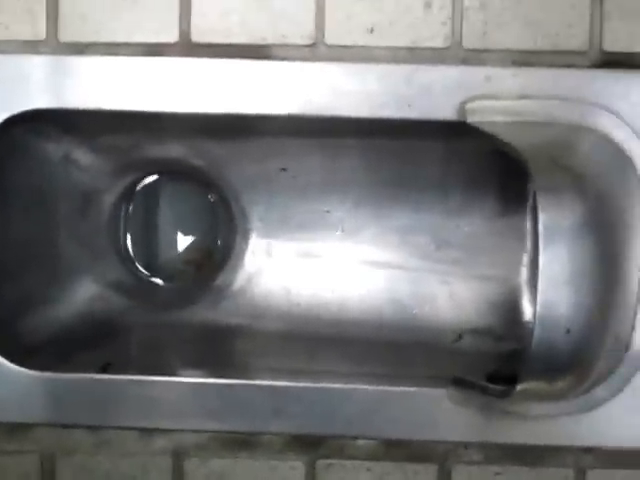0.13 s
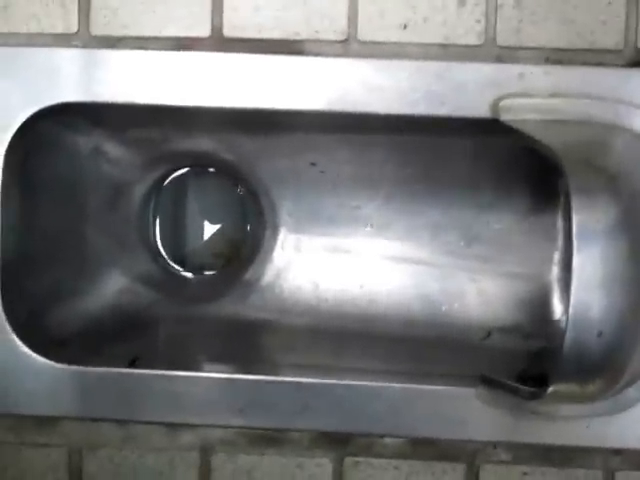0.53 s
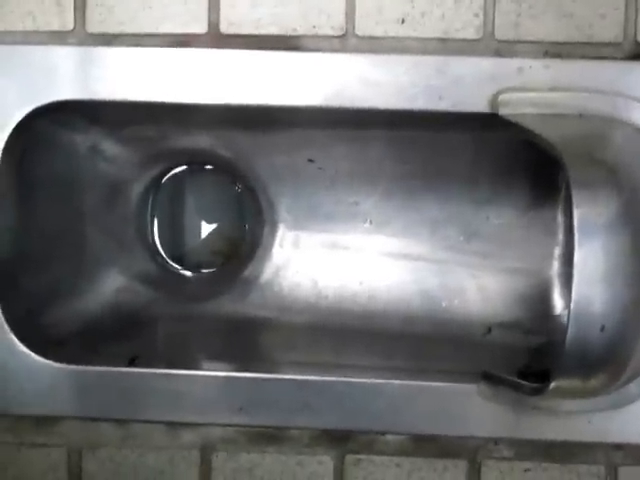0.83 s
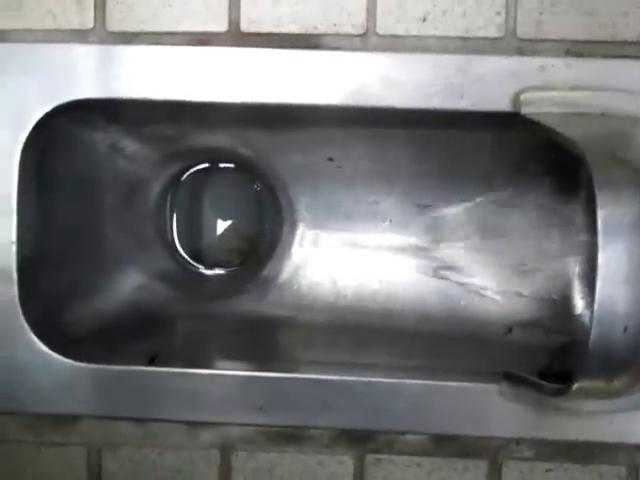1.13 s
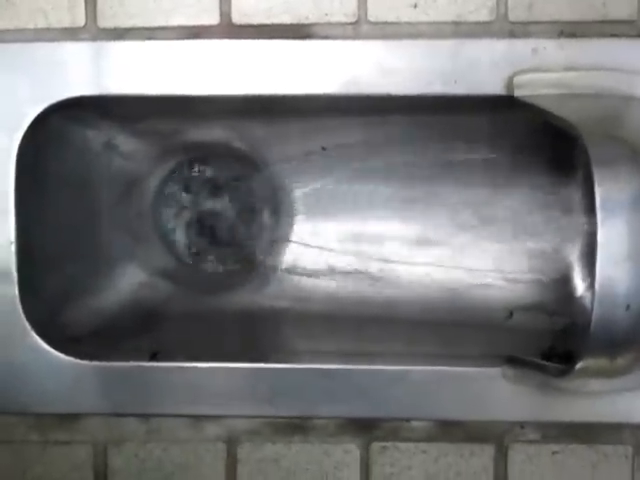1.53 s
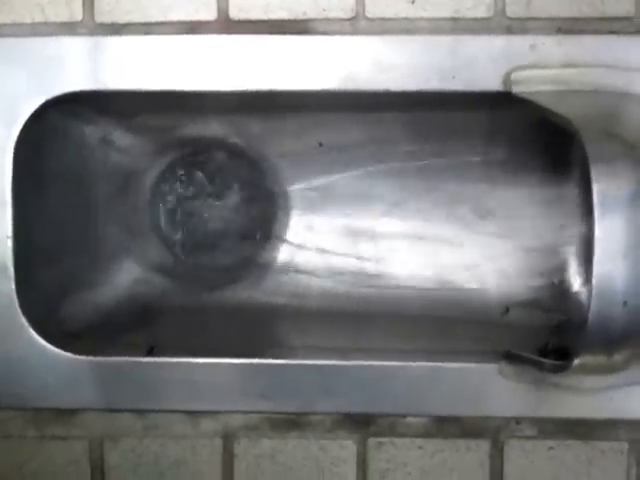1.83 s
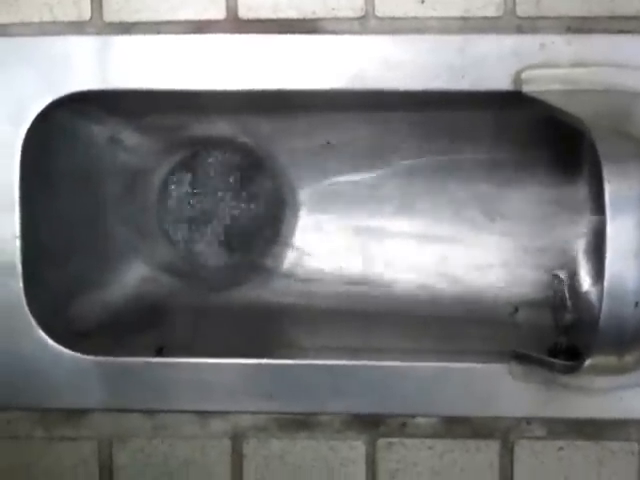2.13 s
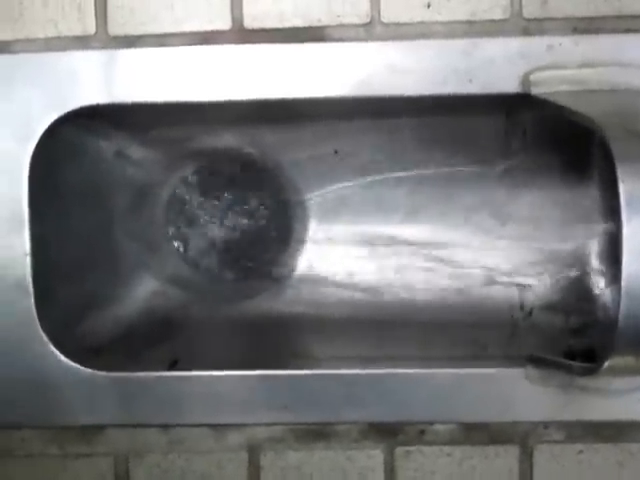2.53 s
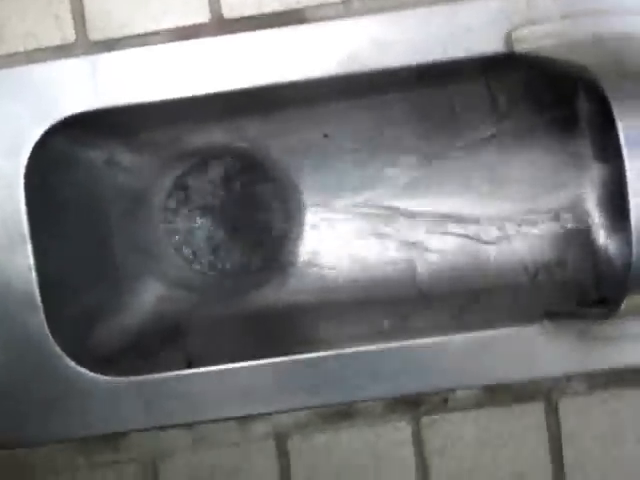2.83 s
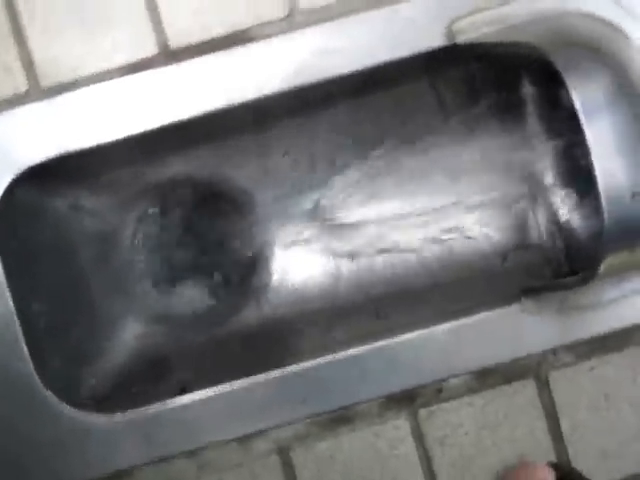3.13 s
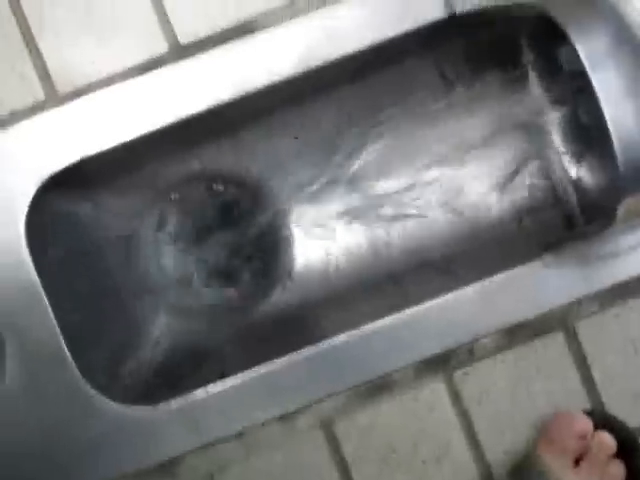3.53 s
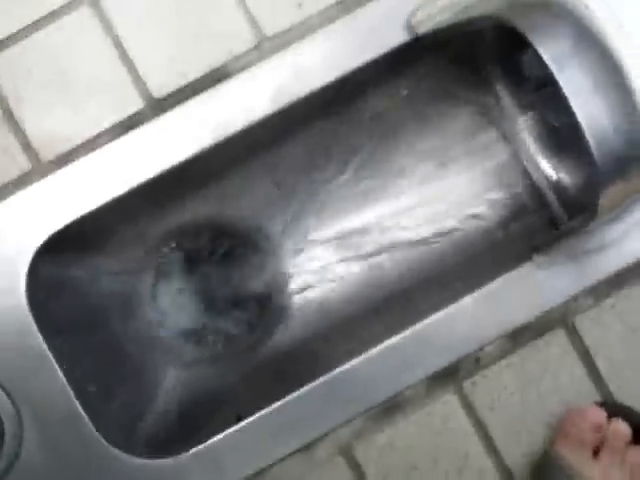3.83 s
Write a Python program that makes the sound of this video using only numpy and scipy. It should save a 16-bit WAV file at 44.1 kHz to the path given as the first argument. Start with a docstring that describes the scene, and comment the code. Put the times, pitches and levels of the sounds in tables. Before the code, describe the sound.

Close handling clicks of a small plastic camera over a thin, growing rush of toilet water.

```python
"""The plastic housing of a small hand-held camera ticks, cracks and rustles in the hand, right at its microphone.
Each tick is a snap and a run of micro-slips that ring the housing. Slaps and scuffs close by, likely sandal and
clothing, are swells of gritty noise. In this tiled restroom a steel squat toilet starts to flush: a thin sheet of
water, made of ringing bubbles, a noisy rush and a few spurts, runs along the trough. Feedback delays give the room;
the electronics whine faintly, a nearly steady sine, over noise hiss and rumble."""
import sys
import numpy as np
from scipy import signal
from scipy.fft import rfft, irfft, next_fast_len
from scipy.io import wavfile

SR = 44100
rng = np.random.default_rng(int(sys.argv[2]) if len(sys.argv) > 2 else 0)


def digitize_waveform(pressure):
    """Quantize a signal to 16-bit integers and store it at the path in sys.argv[1].

    Rows of a 2-D input are taken as channels; values are limited to [-1, 1].
    """
    field = np.atleast_2d(pressure).T
    bounded = np.clip(field, -1, 1)
    quanta = np.round(bounded * 32767).astype(np.int16)
    wavfile.write(sys.argv[1], SR, quanta)


N = 176400  # samples, 4 s
TIME_S = np.arange(N) / SR


def amp(db):
    """dB to gain."""
    return 10 ** (np.asarray(db) / 20)


def rms_one(x):
    """Scale to rms 1."""
    return x / np.sqrt(np.mean(x ** 2) + 1e-20)


def in_time(rows):
    """A (seconds, value) curve at every sample."""
    s, value = np.transpose(rows)
    return np.interp(TIME_S, s, value)


def drift(rate_hz):
    """Random wander of spread 1: noise through two equal low-pass poles, made at every 40th sample."""
    r = np.exp(-80 * np.pi * rate_hz / SR)
    noise = rng.standard_normal(N // 40 + 2002)
    slow = signal.lfilter([1], [1, -2 * r, r * r], noise)[2000:]  # drop the filter's settling
    return np.interp(np.arange(N) / 40, np.arange(len(slow)), rms_one(slow))


def ring(x, hz, t60_s):
    """A resonance: a unit click sets a dying sine of height about 1 ringing."""
    r, w = amp(-60 / (t60_s * SR)), 2 * np.pi * hz / SR
    return signal.lfilter([0, np.sin(w)], [1, -2 * r * np.cos(w), r * r], x + 1e-18)


def filtered(x, order, hz, kind):
    """Butterworth filter."""
    return signal.sosfilt(signal.butter(order, hz, kind, fs=SR, output="sos"), x)


def banded_noise(spectrum, patchy_db, rate_hz):
    """Third-octave bands of noise that flicker partly together, partly each alone; rms 1."""
    hz, db = np.transpose(spectrum)
    edges = 20 * 2 ** np.arange(0, 9.4, 1 / 3)
    out, together, white = 0, drift(rate_hz), rng.standard_normal((2, N))
    for k, (low, high) in enumerate(zip(edges, edges[1:])):
        band = filtered(white[k % 2], 2, [low, high], "band")
        level_db = np.interp(np.log(low * high) / 2, np.log(hz), db)
        out = out + band * amp(level_db + patchy_db * (2 * together + drift(rate_hz)))
    return rms_one(out)


# Ticks of the housing in the hand, at the microphone. Each row: start in seconds, drive level in dB before the modes,
# bass and treble drive in dB relative to it before their lifts, decay time of the slips in ms.
HOUSING_TICKS = [(0.007, -33.5, -14, -8, 3.4), (0.059, -38.5, -7, -25, 4), (0.079, -31, -19.5, -16, 2.6),
                 (0.096, -47.5, 0, -29, 3.5), (0.171, -38, -9.5, -32, 2.7),
                 (0.196, -30.5, -12.5, -14.5, 2.9), (0.204, -34, -12, -18, 3.2),
                 (0.238, -30, -17, -27, 2.5), (0.25, -37.5, -9.5, -8.5, 27),
                 (0.292, -13.5, -14.5, -9.5, 2.8), (0.312, -28.5, -16, -12.5, 11),
                 (0.393, -33.5, -15, -31, 2.2), (0.422, -54, 7, -21, 2.7), (0.436, -34, -13, -7.5, 2.2),
                 (0.47, -31.5, -15, -11, 2.2), (0.495, -29.5, -15, -15, 2.4), (0.515, -27.5, -17, -17, 21),
                 (0.548, -13, -14.5, -9.5, 4.1), (0.562, -30, -24, -11.5, 19), (0.621, -47, -4, -22, 3),
                 (0.677, -34, -10.5, -24, 4.9), (0.721, -16.5, -9, -9.5, 4.3), (0.873, -42, -9.5, -25, 3.2),
                 (0.907, -31, -12.5, -29, 1.5), (0.935, -40.5, -9, -9, 6.1), (0.989, -40.5, -8.5, -11, 5.9),
                 (1.006, -40, -24, -9, 16), (1.015, -26.5, -14, -17, 2), (1.061, -31, -15, -13.5, 1.2),
                 (1.179, -36, -10.5, -20, 3), (1.227, -41.5, -9.5, -11, 4), (1.323, -62, 7.5, -22, 2.7),
                 (1.355, -57, -10, -30, 3), (1.382, -46, -3, -23, 2.5), (1.406, -43.5, -4, -7, 19),
                 (1.445, -12.5, -13, -6.5, 3.1), (1.459, -23, -27, -7, 1.9),
                 (1.502, -21.5, -11.5, -3.5, 1.6), (1.532, -29, -22, -22, 3.3),
                 (1.558, -19.5, -16, -9, 5.6), (1.596, -11, -19, -16, 0.97), (1.656, -26, -10.5, -9, 3),
                 (1.701, -33.5, -4, -22, 3.7), (1.728, -25.5, -13.5, -18, 2.7), (1.747, -38, -25, -8, 2.2),
                 (1.782, -33.5, 0, -1.5, 4.8), (1.852, -38, -9.5, -21, 3.2), (1.94, -37, -8, -21, 7.9),
                 (1.993, -38.5, -4.5, -5.5, 4.5), (2.04, -34.5, -13, -16, 3.5),
                 (2.086, -30.5, -13, -18.5, 2.2), (2.171, -42.5, -1.5, -11, 3),
                 (2.381, -19.5, -11.5, -6, 3.8), (2.408, -40, -12, -7, 3.5), (2.425, -32, -13, -18, 4.1),
                 (2.463, -42, -7, -21, 3), (2.599, -36, -13, -8, 3.3), (2.666, -14.5, -15, -1.5, 2.6),
                 (2.736, -32, -14, -13, 2.5), (2.758, -43.5, 4.5, -10, 3.8),
                 (2.823, -22.5, -16.5, -25.5, 5.1), (2.858, -37, -7, -21, 3), (2.884, -36.5, -12, -31, 3.9),
                 (2.93, -34, -9, -27, 2.6), (2.995, -31, -10.5, -20, 3.4), (3.032, -47, -7, -18, 2.7),
                 (3.075, -34.5, -13, -3, 2.3), (3.082, -33.5, -3.5, -20, 5.6),
                 (3.222, -28, -15.5, -26, 2.8), (3.243, -33.5, -4.5, -32, 3.3), (3.27, -36.5, -11, -18, 3),
                 (3.323, -35, -9.5, -20, 5.1), (3.435, -35.5, -13, -34, 4.2), (3.489, -30, -7.5, -10.5, 14),
                 (3.539, -26.5, -14, -15, 1.3), (3.56, -32, -10, -15, 11), (3.622, -1, -28.5, -12, 2.3),
                 (3.696, -11.5, -25.5, -32, 2.9), (3.728, -18.5, -13, -12, 1.2),
                 (3.85, -11.5, -20.5, -12.5, 2.1), (3.896, -38.5, -1, -8, 1.8),
                 (3.966, -41.5, -3, -5.5, 14)]
# Ringing modes of the plastic housing. Each row: frequency in Hz, relative level in dB, 60 dB decay in seconds.
HOUSING_MODES = [(401.4, -3, 0.027), (591, -6.5, 0.032), (668, -1.5, 0.02), (947, -2, 0.021),
                 (1230, -2.5, 0.022), (1440, -3.5, 0.031), (1622, 1.5, 0.015), (2240, -2.5, 0.019),
                 (2670, 0.5, 0.0096), (3830, -5.5, 0.0045), (4615, -7.5, 0.01), (5760, -3, 0.0043),
                 (6730, -19, 0.0083), (6955, -5, 0.0034), (8650, -12, 0.0057), (11420, -2.5, 0.006)]
BASS_HZ, TREBLE_HZ = 800, 2400  # modes up to / above these take the bass / treble drive
BASS_LIFT_DB, TREBLE_LIFT_DB = 15.5, 12
SNAP_DELAY_S, SLIP_DB, CRACK_DB, THUMP_DB = 0.0014, -12, -22.5, -15
SMALL_TICKS_PER_S, SMALL_TICK_MIN_DB = 25, -54
MODE_SCATTER_DB, HOUSING_LOW_CUT_HZ = 2.5, 260


def housing():
    """Each tick is a snap and a dying run of bright micro-slips; they ring the modes and crack."""
    t = np.arange(int(.03 * SR)) / SR
    drives = np.zeros((3, N + 2 * len(t)))  # bass, middle, treble
    grits = rng.standard_normal((len(HOUSING_TICKS), len(t)))
    for (s, db, bass_db, treble_db, decay_ms), grit in zip(HOUSING_TICKS, grits):
        slips = amp(SLIP_DB) * np.diff(grit, prepend=0) * np.exp(-1000 * t / max(decay_ms, .2))
        slips[0] = 1  # the snap
        i = int((s + SNAP_DELAY_S) * SR)
        levels_db = [[db + bass_db + BASS_LIFT_DB], [db], [db + treble_db + TREBLE_LIFT_DB]]
        drives[:, i:i + len(t)] += slips * amp(levels_db)

    # random small ticks reach only the bass and middle drives
    small_db = SMALL_TICK_MIN_DB + 2.2 * np.minimum(rng.exponential(1, N), 3)
    drives[:2, :N] += (rng.random(N) < SMALL_TICKS_PER_S / SR) * amp(small_db)
    bass_middle_treble = drives[:, :N]

    crack = amp(CRACK_DB) * bass_middle_treble[2]
    thump = amp(THUMP_DB) * signal.lfilter(np.hanning(9), 1, bass_middle_treble[1])
    out = -crack - thump
    for k, (hz, mode_db, t60_s) in enumerate(HOUSING_MODES):
        drive = bass_middle_treble[int(hz > BASS_HZ) + int(hz > TREBLE_HZ)]
        scattered = drive * amp(MODE_SCATTER_DB * drift(39.6))
        out = out + (-1) ** k * amp(mode_db - 10.5) * ring(scattered, hz, t60_s)
    return filtered(out, 3, HOUSING_LOW_CUT_HZ, "high")


# Level of the housing's rustle at the microphone. Each row: time in seconds, level in dB.
RUSTLE_LEVEL = [(0.0, -64), (0.11, -64), (0.44, -57.5), (0.75, -54), (1.14, -107), (1.25, -93),
                (1.47, -42.5), (1.6, -47.5), (1.92, -59), (2.15, -63), (2.36, -57), (2.6, -51),
                (3.02, -55.5), (3.49, -51.5), (3.74, -42.5), (3.9, -43), (4.0, -66.5)]
# Colour of that rustle. Each row: frequency in Hz, relative density in dB per Hz.
RUSTLE_COLOUR = [(150, -4.5), (900, 3.5), (2000, -2), (3500, -1.5), (5000, -4), (11000, -2.5)]


def housing_rustle():
    """Rubbing plastic: flickering broad noise that follows a level curve."""
    return amp(in_time(RUSTLE_LEVEL)) * banded_noise(RUSTLE_COLOUR, patchy_db=1.4, rate_hz=30)


SWELL_OCTAVES, SWELL_BROAD_DB, SWELL_TOP_HZ = .5, -13, 6000  # pitched band's width; broad part
GRAIN_DB, GRAIN_RATE_HZ = 3, 300
CONTACT_MS = 9  # first contact's push is this over the rise time


def swells(rows):
    """Swells of gritty noise around their own pitch; the quicker the rise, the harder the first contact."""
    t, out = np.arange(int(.14 * SR)) / SR, np.zeros(N + SR)
    grains = amp(GRAIN_DB * drift(GRAIN_RATE_HZ))
    half_band = SWELL_OCTAVES * np.array([-.5, .5])
    for (s, db, rise_ms, fall_ms, hz), grit in zip(rows, rng.standard_normal((len(rows), len(t)))):
        i = int(s * SR)
        fall = np.exp(-np.maximum(1000 * t - rise_ms, 0) / fall_ms)
        shape = np.clip(1000 * t / rise_ms, 0, 1) * fall
        push = shape * grit * grains[i:][:len(t)]
        push[0] = CONTACT_MS / rise_ms
        pitched = rms_one(filtered(push, 2, hz * 2 ** half_band, "band"))
        broad = rms_one(filtered(push, 2, SWELL_TOP_HZ, "low"))
        burst = pitched + amp(SWELL_BROAD_DB) * broad
        same_energy = np.sqrt(np.sum(shape ** 2) / np.sum(burst ** 2))
        out[i:i + len(t)] += amp(db) * burst * same_energy
    return out[:N]


# Slaps, scuffs and rustles close by, likely sandal and clothing. Each row: start in seconds,
# level in dB before the sound hole, rise in ms, fall in ms, centre in Hz.
CLOSE_RUBS = [(.728, -49.5, 10, 76, 209), (.775, -52, 29, 23, 920), (.80, -54, 8.4, 12, 530),
              (.745, -54, 30, 94, 1550), (0.761, -61.5, 38, 220, 2450), (0.862, -53.5, 10, 100, 980),
              (.935, -56.5, 24, 61, 2450), (.325, -49, 13, 20, 2150), (1.597, -18, 0.24, 2.4, 1070),
              (1.598, -22, 0.79, 4, 640), (.95, -46.5, 10, 31, 1500), (1.642, -51, 5, 21, 2500),
              (3.489, -42, 1.4, 32, 920), (3.599, -21, 1.3, 7.7, 1390), (3.6222, -1, 0.33, 1.63, 1308),
              (3.629, -21, 6.2, 14, 1290), (3.65, -43, 3, 10, 1500), (3.674, -12.5, 2.3, 3.1, 1500),
              (3.699, -18.5, 7.9, 5.8, 1300), (3.719, -32, 3, 12, 1500), (3.715, -42, 6.4, 37, 410),
              (3.759, -25, 0.44, 5.3, 1500), (3.793, -20, 0.42, 2, 1500), (3.800, -17, 1.6, 4.3, 1380),
              (3.856, -25.5, 1.1, 4.1, 656)]


def close_rubs():
    """Rubbing and slapping surfaces, each contact one swell of gritty noise."""
    return swells(CLOSE_RUBS)


# Running water in the trough. Each row: time in seconds, level in dB before the shares of bubbles and rush.
WATER_FLOW = [(1.3, -77), (1.46, -69), (1.6, -57), (2.01, -55), (2.25, -52), (2.51, -51), (3.02, -49.5),
              (3.33, -47), (3.5, -47), (3.7, -38.5), (3.87, -49), (4.0, -50.5)]
# Colour of the rush, also the bubbles' gain by pitch. Each row: frequency in Hz, relative density in dB per Hz.
WATER_COLOUR = [(150, -40), (300, -26), (900, -9), (1300, -49), (1700, 0), (2800, -5.5), (4000, 5),
                (7000, 7.5), (11000, -43)]
BUBBLES_PER_S = 1600  # before clumping
BUBBLE_LOW_HZ, BUBBLE_HIGH_HZ, BUBBLE_CYCLES = 1440, 3530, 27  # cycles to die by 60 dB
BUBBLE_DB, RUSH_DB = -1, -7.5


def water():
    """Small bubbles ring briefly, in clumps, over a patchy rush; both follow the flow."""
    sizes = amp(2.5 * np.minimum(rng.exponential(1, N), 4)) * rng.choice([-1, 1], N)
    born = rng.random(N) < BUBBLES_PER_S * amp(3.5 * drift(12)) / SR
    pitches_hz = np.geomspace(BUBBLE_LOW_HZ, BUBBLE_HIGH_HZ, 30)
    dealt = rng.integers(0, 30, N)
    hz, db = np.transpose(WATER_COLOUR)
    bubbles = 0
    for k, pitch_hz in enumerate(pitches_hz):
        soft_pushes = signal.lfilter(np.hanning(40), 1, sizes * born * (dealt == k))
        drive = soft_pushes * np.cos(2 * np.pi * pitch_hz * TIME_S)  # moved up to the pitch
        gain = amp(np.interp(np.log(pitch_hz), np.log(hz), db))
        bubbles = bubbles + gain * ring(drive, pitch_hz, BUBBLE_CYCLES / pitch_hz)
    rush = banded_noise(WATER_COLOUR, patchy_db=2.0, rate_hz=13.6)
    fade_in = np.clip((TIME_S - WATER_FLOW[0][0]) / .3, 0, 1)
    mix = amp(BUBBLE_DB) * rms_one(bubbles) + amp(RUSH_DB) * rush
    return fade_in * amp(in_time(WATER_FLOW)) * mix


# First spurts of water over the steel. Each row: start in seconds, level in dB before the sound hole,
# rise in ms, fall in ms, centre in Hz.
WATER_SPURTS = [(1.925, -47.5, 2.5, 20, 2860), (2.143, -47, 3.6, 7.9, 1850), (2.247, -45.5, 5.3, 33, 2330),
                (2.447, -41.5, 1.6, 9.1, 1770), (3.165, -47, 3, 19, 1750), (3.452, -37.5, 2.1, 9.8, 1740)]


def water_spurts():
    """Each spurt over the steel is one swell of gritty noise."""
    return swells(WATER_SPURTS)


ROOM_T60_S, WALL_CUT_HZ, ROOM_LOW_CUT_HZ = 0.099, 12000, 500  # decay before the walls' dulling
ROOM_DB = -16


def restroom(x):
    """Tiled walls: ten feedback delays, duller on every round."""
    size = next_fast_len(N + SR)
    w = 2 * np.pi * np.arange(size // 2 + 1) / size
    dull = 1 / (1 + 1j * w * SR / (2 * np.pi * WALL_CUT_HZ))
    response = 0
    for k, lag_s in enumerate(np.geomspace(.006, .023, 10)):
        loop = amp(-60 * lag_s / ROOM_T60_S) * dull * np.exp(-1j * w * lag_s * SR)
        response = response + (-1) ** k * loop / (1 - loop)
    sent = filtered(x, 1, ROOM_LOW_CUT_HZ, "high")
    return irfft(rfft(sent, size) * response, size)[:N]


# Resonances of the sound hole before the microphone. Each row: frequency in Hz, width in Hz, peak gain in dB.
SOUND_HOLE = [(408, 48, -2.5), (632, 75, 4.5), (896, 134, -5), (1339, 393, 4), (1500, 320, 3),
              (1663, 142, 6.5), (1832, 92, -4), (2450, 170, 7), (2980, 98, -5), (3830, 320, -45),
              (4900, 650, -8)]
HOLE_DIRECT_DB = -4


def sound_hole(x):
    """Parallel resonances of the hole colour airborne sound, over a little direct sound."""
    out = amp(HOLE_DIRECT_DB) * x
    for k, (hz, width_hz, db) in enumerate(SOUND_HOLE):
        r = np.exp(-np.pi * width_hz / SR)
        zeros = np.array([1, 0, -1]) * (1 - r * r) / 2
        poles = [1, -2 * r * np.cos(2 * np.pi * hz / SR), r * r]
        out = out + (-1) ** k * amp(db) * signal.lfilter(zeros, poles, x)
    return out


# Colour of the hiss. Each row: frequency in Hz, relative density in dB per Hz.
HISS_COLOUR = [(20, -1), (100, -2), (240, -6.5), (400, -10), (1600, -9), (2200, -15), (4200, -18),
               (7500, -18.5), (9900, -22.5), (12000, -8)]
HISS_DB, HISS_PATCHY_DB = -57, 1.0
RUMBLE_TOP_HZ, RUMBLE_DB, RUMBLE_WANDER_DB = 62, -62.5, 2.5
WHINE_HZ, WHINE_DB, WHINE_STEP_AT_S, WHINE_STEP_DB = 5880, -60.5, 3.1, -1.5


def background():
    """Noise hiss, lumpy low-band rumble and the electronics' thin, nearly steady sine whine."""
    hiss = amp(HISS_DB) * banded_noise(HISS_COLOUR, HISS_PATCHY_DB, rate_hz=4.8)
    low_noise = rms_one(filtered(rng.standard_normal(N), 2, [22, RUMBLE_TOP_HZ], "band"))
    rumble = amp(RUMBLE_DB + RUMBLE_WANDER_DB * drift(3.5)) * low_noise
    whine_db = WHINE_DB + WHINE_STEP_DB * (TIME_S > WHINE_STEP_AT_S) + 0.47 * drift(11)
    whine = amp(whine_db) * np.sqrt(2) * np.sin(2 * np.pi * WHINE_HZ * TIME_S)
    return hiss + rumble + whine


def scene():
    """Housing ticks; water, scuffs and room through the sound hole; rustle and background."""
    ticks = housing()
    air = water() + water_spurts() + close_rubs()
    echoes = amp(ROOM_DB) * restroom(ticks + air)
    return (ticks + sound_hole(air + echoes) + housing_rustle() + background())[None]


DIP_HZ, DIP_WIDTH_HZ, DIP_SHARE = 1960, 59, 0.99
MIC_STOP_HZ, MIC_STOP_DB, CUTOFF_HZ = 11500, 40, 15900


def record(dry):
    """The small microphone has a narrow dip and loses the top; a steep cut ends the band."""
    peak = signal.lfilter(*signal.iirpeak(DIP_HZ, DIP_HZ / DIP_WIDTH_HZ, fs=SR), dry)
    dipped = dry - DIP_SHARE * peak
    mic = signal.sosfilt(signal.cheby2(10, MIC_STOP_DB, MIC_STOP_HZ, fs=SR, output="sos"), dipped)
    return signal.sosfilt(signal.cheby2(12, 70, CUTOFF_HZ, fs=SR, output="sos"), mic)


dry = scene()
out = record(dry)
digitize_waveform(out)
```